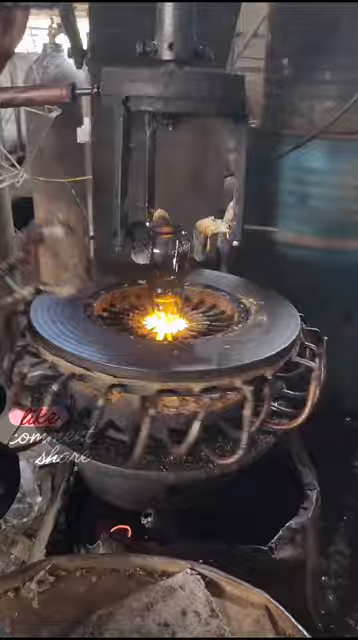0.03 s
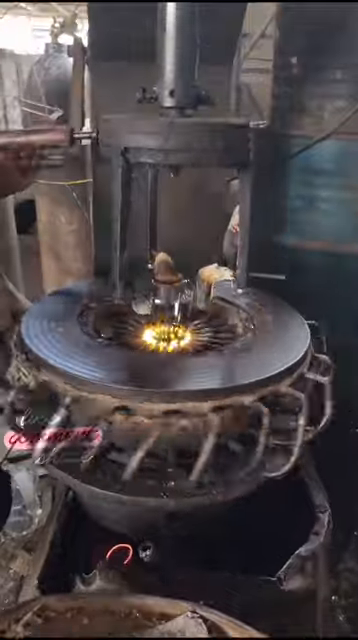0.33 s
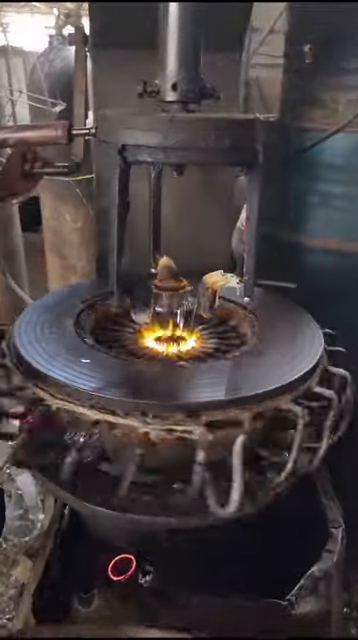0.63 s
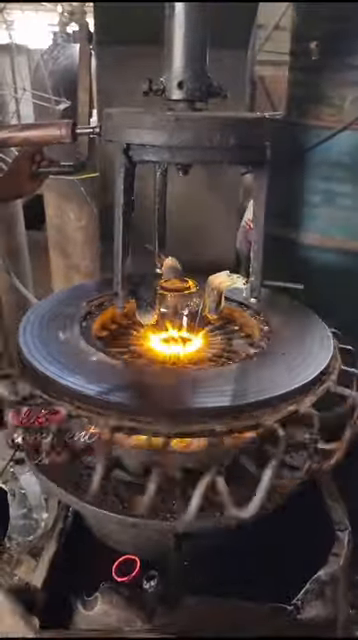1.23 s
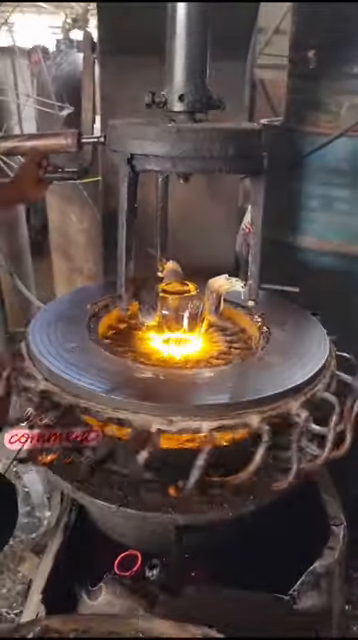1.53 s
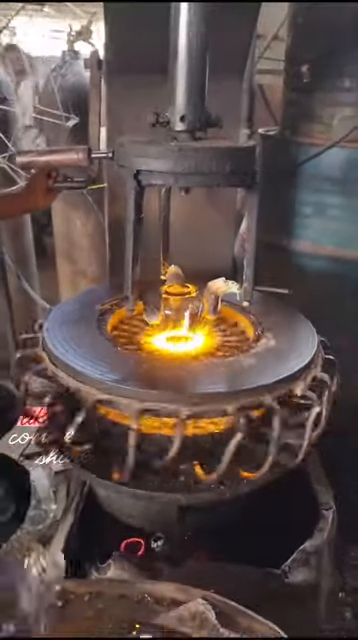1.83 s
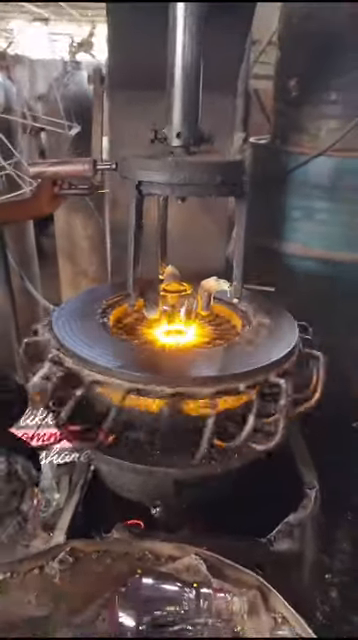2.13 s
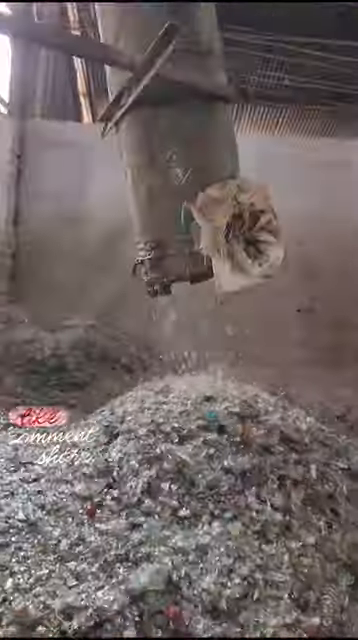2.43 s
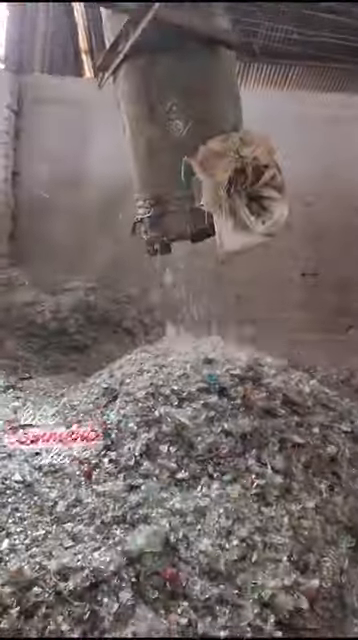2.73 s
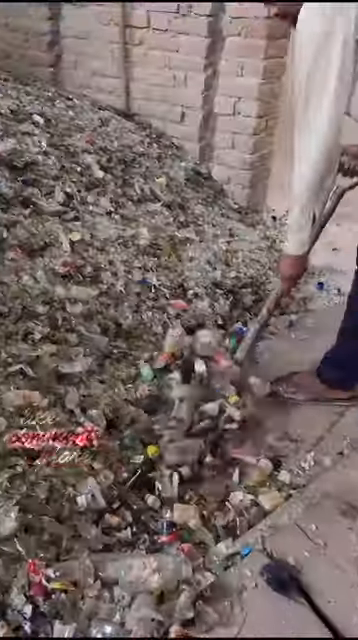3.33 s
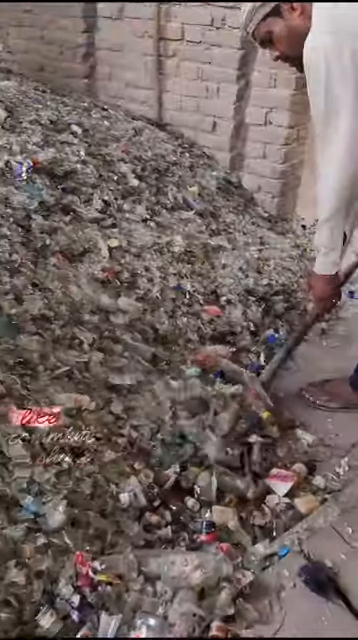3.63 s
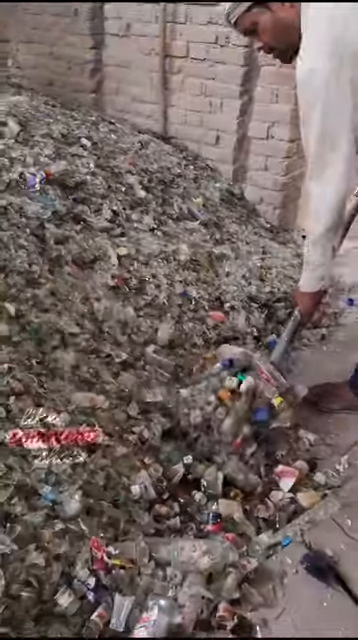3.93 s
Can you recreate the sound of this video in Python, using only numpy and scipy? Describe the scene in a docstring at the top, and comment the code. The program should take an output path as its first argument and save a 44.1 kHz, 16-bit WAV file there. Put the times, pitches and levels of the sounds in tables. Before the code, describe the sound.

A ring of gas burners roars, hums and hisses in a workshop while a steel press clanks a few times. Abruptly, crushed glass streams from a chute over a low machinery rumble, then a rake crunches through coarse shards.

```python
"""Glassworks: burners, press, crushed glass

A ring of gas burners roars, hums and hisses in a shop; a steel press clanks a few times.
Abrupt change to a heap over plant rumble: crushed glass streams from a chute,
then a rake drags through coarse shards. Each collision rings a piece of glass as a decaying sine."""
import sys
import numpy as np
from scipy import signal
from scipy.io import wavfile

SR = 44100
rng = np.random.default_rng(int(sys.argv[2]) if len(sys.argv) > 2 else 0)


def dump(signal):
    """Clip the signal to [-1, 1] and save it as 16-bit WAV at the path in sys.argv[1]."""
    limited = np.clip(np.atleast_2d(signal).T, -1, 1)
    pcm = np.round(limited * 32767).astype(np.int16)
    wavfile.write(sys.argv[1], SR, pcm)


N = 176400
T = np.arange(N) / SR
BURNER_ON_S, POUR_ON_S, RAKE_ON_S = 0.2724, 2.505, 3.23
CUTOFF_HZ = 15700

# heavy clanks: t/s, frame thud/dB, burner dip/dB
JOLTS = [(0.986, -11, 3), (1.56, -5.5, 3.5)]
# left-right likeness in the shop and at the heap: f/Hz, correlation
SHOP_CORRELATION = [(60, 1), (150, 0.99), (280, 0.92), (550, 0.64), (1000, 0.13), (2000, -0.25),
                    (4000, -0.057), (12000, -0.025)]
HEAP_CORRELATION = [(60, .99), (150, 0.99), (280, 0.91), (550, 0.64), (1000, 0.11), (2000, 0.22),
                    (4000, 0.38), (12000, 0.35)]


def from_db(db):
    """Decibels to gain."""
    return 10 ** (np.asarray(db) / 20)


def unit_rms(x):
    """Scale to rms 1."""
    return x / np.sqrt(np.mean(x ** 2) + 1e-20)


def gain_curve(rows):
    """Gain over time from rows of t/s, level/dB."""
    return from_db(np.interp(T, *np.transpose(rows)))


def at_hz(rows, hz):
    """Read a table on a log-frequency axis."""
    freqs_hz, values = np.transpose(rows)
    return np.interp(np.log(hz), np.log(freqs_hz), values)


def after(t_s):
    """Switch from 0 to 1 in 3 ms."""
    return np.clip((T - t_s) / .003, 0, 1)


def pan(left_db):
    """Left and right gains, left_db apart."""
    return from_db(np.array([[left_db], [-left_db]]) / 2)


def drift(rate_hz):
    """Slow random wander, rms 1."""
    step = 40
    pole = np.exp(-2 * np.pi * rate_hz * step / SR)
    slow = signal.lfilter([1], [1, -2 * pole, pole * pole], rng.standard_normal(N // step + 2002))[2000:]
    return np.interp(np.arange(N) / step, np.arange(len(slow)), unit_rms(slow))


def ring(drive, hz, t60_s):
    """Resonator: a unit click starts a decaying unit sine."""
    r, w = np.exp(-np.log(1000) / (t60_s * SR)), 2 * np.pi * min(hz, SR / 2) / SR
    return signal.lfilter([0, np.sin(w)], [1, -2 * r * np.cos(w), r * r], drive + 1e-18)


def clicks(t_s, db):
    """Impulse train."""
    return np.bincount((np.atleast_1d(t_s) * SR).astype(int), np.atleast_1d(from_db(db)), N)[:N]


def decay(hits, t60_s):
    """Envelope that jumps at each hit and dies away."""
    pole = np.exp(-2 * np.log(1000) / (t60_s * SR))
    return np.sqrt(signal.lfilter([1], [1, -pole], hits ** 2 + 1e-18))


def butter(x, order, hz, kind):
    """Butterworth filter."""
    return signal.sosfilt(signal.butter(order, hz, kind, fs=SR, output="sos"), x)


def stereo(pair, correlation):
    """Mix two independent signals to a left-right correlation."""
    correlation = np.clip(correlation, -.999, .999)
    return np.sqrt(1 + correlation) * pair[0] + np.sqrt(1 - correlation) * pair[1] * [[1], [-1]]


def banded_noise(spectrum, correlation, flicker_db=0):
    """Stereo noise in third octaves, each with its own level and flicker; rms 1."""
    out, edges_hz = 0, 22 * 2 ** (np.arange(30) / 3)
    white = rng.standard_normal((2, 2, N))
    for k, (low, high) in enumerate(zip(edges_hz, edges_hz[1:])):
        hz, flicker = np.sqrt(low * high), drift(14.4)
        if high > spectrum[0][0] and low < spectrum[-1][0]:
            band = stereo(butter(white[k % 2], 2, [low, high], "band"), at_hz(correlation, hz))
            out = out + from_db(at_hz(spectrum, hz) + flicker_db * flicker) * band
    return unit_rms(out)


def comb_colour(x):
    """Short delayed copies give the upper range a faint ringing colour."""
    out, upper = x.copy(), butter(x, 2, 920, "high")
    delays_s = rng.uniform(.001, .007, 10)
    for k, lag in enumerate((delays_s * SR).astype(int)):
        out[k % 2, lag:] += from_db(-11.5) * upper[k % 2, :-lag]
    return out


def flames():
    """Turbulent flames roar and excite the burner ring's resonances."""
    # roar: t/s, level/dB
    roar_levels = [(.3, -17.5), (1.0, -17.5), (1.35, -18), (1.7, -21), (2.2, -19.5), (2.5, -19.5)]
    # roar: f/Hz, density/dB
    spectrum = [(25, -45), (44, -15.5), (65, -7.5), (125, -3.5), (175, -5.5), (220, -6), (260, -9.5),
                (330, -10), (410, -16.5), (600, -14), (800, -14), (1050, -21.5), (1400, -40), (2200, -27)]
    # resonances at mean roar: f/Hz, width/Hz, level/dB
    resonances = [(198.6, 8.7, -25), (444, 23, -31.5), (515.7, 13, -34.5), (790, 26, -39.5), (882, 44, -33)]
    gain = gain_curve(roar_levels)
    roar = banded_noise(spectrum, SHOP_CORRELATION, flicker_db=2.5)
    tones = 0
    for hz, width_hz, db in resonances:
        pair = ring(rng.standard_normal((2, N)), hz, t60_s=np.log(1000) / (np.pi * width_hz))
        tones = tones + from_db(db) * unit_rms(stereo(pair, at_hz(SHOP_CORRELATION, hz)))
    return gain * roar + gain / gain.mean() * tones


def hum():
    """A low wavering hum that swells briefly three times."""
    # swells: peak t/s, boost/dB, half width/s
    swells = [(.44, 7.8, 0.033), (1.33, 6.2, 0.061), (1.8, 7.3, 0.15)]
    boost_db = sum(db * np.exp(-((T - t_s) / half_s) ** 2) for t_s, db, half_s in swells)
    pitch_hz = 166.3 + 10.85 * drift(21.5)
    return from_db(-23 + boost_db) * np.sin(2 * np.pi * np.cumsum(pitch_hz) / SR)


def jets():
    """Gas hisses at the jets."""
    # hiss: t/s, level/dB
    hiss_levels = [(.3, -26), (.6, -25), (.95, -25.5), (1.35, -26), (1.38, -23.5), (1.45, -27), (1.5, -25),
                   (1.75, -30), (2.1, -28.5), (2.5, -27.5)]
    # hiss: f/Hz, density/dB
    spectrum = [(700, -58), (1200, 0.5), (1800, 0), (4500, -11), (7000, -11.5), (10000, -20), (13500, -23),
                (15500, -48)]
    hiss = banded_noise(spectrum, SHOP_CORRELATION, flicker_db=1.8)
    return gain_curve(hiss_levels) * unit_rms(comb_colour(hiss))


def burners():
    """Flames, hum and jets; all dip briefly at the heavy clanks."""
    in_s, out_s = 0.014, 0.043
    dip_db = sum(db * np.exp(-np.maximum((t_s - T) / in_s, (T - t_s) / out_s)) for t_s, _, db in JOLTS)
    return (flames() + hum() + jets()) * from_db(-dip_db)


def press():
    """Steel strikes steel: crack, ping, ringing modes, frame thud, then the shop's echo."""
    # clanks: t/s, strike/dB, ping of the struck part f/Hz, level/dB, t60/s
    clanks = [(0.980, -18, 2310, -18.5, .025), (0.989, -7, 3110, -13.5, 0.024),
              (0.991, -11.5, 8102, -25, 0.093), (1.114, -14, 1040, -17.5, 0.032),
              (1.362, -10.5, 13900, -30, .02), (1.496, -15, 7250, -20, .014),
              (1.560, 2.5, 2220, -20, 0.036), (1.567, -3.5, 7800, -21, 0.021),
              (1.569, -7.5, 1290, -15, .045)]
    # press modes: f/Hz, level re strike/dB, t60/s
    modes = [(1265, -26, 0.073), (2140, -32, .15), (2614, -30.5, 0.12), (4130, -28, .1), (4770, -21, 0.046),
             (5625, -24, 0.066), (6200, -25, 0.073), (7214, -26, 0.04)]
    # crack and echo: f/Hz, density/dB
    crack_spectrum = [(300, -10), (1500, -17), (4500, 9), (8000, -5), (10000, -4), (15000, -8)]
    echo_spectrum = [(200, -38), (900, 6), (2000, 3.5), (3200, -6.5), (5500, -6), (9000, -18), (15000, -28)]
    strike_s, strike_db = np.transpose(clanks)[:2]
    ringing = np.zeros((2, N))
    for hz, db, t60_s in modes:
        for side in range(2):
            jitter_s = rng.uniform(0, 0.45, len(strike_s)) / hz
            ringing[side] += ring(clicks(strike_s + jitter_s, strike_db + db), hz, t60_s)
    pings = sum(ring(clicks(t_s, db), hz, t60_s) for t_s, _, hz, db, t60_s in clanks)
    crack_gain = decay(clicks(strike_s, strike_db - 12.5), t60_s=.014)
    echo_gain = decay(clicks(strike_s + 0.0078, strike_db - 20.5), t60_s=0.41)
    crack = crack_gain * banded_noise(crack_spectrum, SHOP_CORRELATION)
    echo = echo_gain * banded_noise(echo_spectrum, SHOP_CORRELATION)
    thuds = sum(ring(clicks(t_s, db), hz=56, t60_s=0.038) for t_s, db, _ in JOLTS)
    return ringing + pings + crack + echo + thuds


def plant():
    """The plant rumbles behind the heap."""
    # rumble: f/Hz, density/dB
    spectrum = [(22, -33), (45, -19), (70, -6.5), (108, -2), (165, -2.5), (250, -6.5), (450, -16.5),
                (900, -24), (1800, -29.5), (3000, -82)]
    return from_db(-18) * banded_noise(spectrum, HEAP_CORRELATION, flicker_db=1.83) * after(POUR_ON_S)


def shards(spectrum, gate, per_s, spread_db, t60_s, low_hz):
    """Random glass collisions, each with its own pitch, ring time and place; rms 1 while gated on."""
    out, chance = np.zeros((2, N + SR)), np.cumsum(gate) / gate.sum()
    count = int(per_s * gate.sum() / SR)
    when, size, pitch, length, place, sign = rng.random((8000, 6))[:count].T
    starts = np.searchsorted(chance, when)
    freqs_hz = (np.sqrt(low_hz) + pitch * (np.sqrt(CUTOFF_HZ) - np.sqrt(low_hz))) ** 2
    rings_s = np.minimum(t60_s * 2 ** (2 * length - 1) * np.sqrt(6000 / freqs_hz), .5)
    levels_db = at_hz(spectrum, freqs_hz) - spread_db * np.log(.03 + .97 * size)
    gains = np.sign(sign - .5) * from_db(levels_db) * freqs_hz ** .25 / np.sqrt(rings_s)
    for start, hz, ring_s, gain, side in zip(starts, freqs_hz, rings_s, gains, 2 * place - 1):
        ear_delay_s = .0002 * (1 + side * np.array([[-1], [1]]))
        t = np.maximum(T[:int(ring_s * SR) + 2] - ear_delay_s, 0)
        ping = np.sin(2 * np.pi * hz * t) * np.exp(-np.log(1000) * t / ring_s)
        out[:, start:start + t.shape[1]] += gain * pan(4 * side) * ping
    return unit_rms(out[:, :N]) * np.sqrt(gate.mean())


def jostled(pieces_hz, per_s, t60_s):
    """Large pieces ring under repeated knocks; rms 1."""
    out = 0
    for hz in pieces_hz:
        knocks = (rng.random(N) < per_s / SR) * rng.uniform(-0.75, 1, (2, N))
        out = out + ring(knocks, hz, t60_s)
    return unit_rms(out)


def pour():
    """Falling crumbs tick, tinkle and merge to a hiss on the heap; surges add a bright sizzle."""
    # stream: t/s, level/dB
    stream_levels = [(2.51, -31), (2.6, -30.5), (2.82, -28.5), (2.98, -31), (3.17, -27), (3.23, -28.5)]
    # stream and sizzle: f/Hz, density/dB
    spectrum = [(700, 4.5), (1400, 1), (4000, -3.5), (8800, -4), (10000, -8), (13500, -2), (15000, -4),
                (16000, -27)]
    sizzle_spectrum = [(4000, -15), (6000, -4), (7200, 2.5), (8700, 1.5), (10000, -12), (13500, -7),
                       (16000, -20)]
    # large pieces under the chute: f/Hz
    pieces_hz = [6870, 7400, 9340, 13265]
    # surges: peak t/s, level/dB, half width/s
    surges = [(2.515, -29, 0.027), (2.665, -27, 0.23), (2.802, -38, 0.027), (2.893, -30.5, 0.04)]
    gate = after(POUR_ON_S) - after(RAKE_ON_S)
    ticks = from_db(-0.5) * shards(spectrum, gate, per_s=5000, spread_db=0.5, t60_s=0.0042, low_hz=1140)
    tinkles = shards(spectrum, gate, per_s=2000, spread_db=3.2, t60_s=0.11, low_hz=2000)
    wash = from_db(-5) * banded_noise(spectrum, HEAP_CORRELATION, flicker_db=1.5)
    pieces = from_db(-15) * jostled(pieces_hz, per_s=41, t60_s=0.23)
    stream = gain_curve(stream_levels) * (ticks + tinkles + wash + pieces)
    surge = sum(from_db(db) * np.exp(-((T - t_s) / half_s) ** 2) for t_s, db, half_s in surges)
    sizzle = surge * shards(sizzle_spectrum, gate, per_s=4500, spread_db=1, t60_s=0.05, low_hz=4050)
    return comb_colour(gate * (stream + sizzle)) * pan(-1.5)


def chinks():
    """Single larger pieces ring clear of the mass."""
    # pieces: t/s, f/Hz, level/dB, t60/s
    pieces = [(2.507, 7530, -21, 0.11), (2.507, 8400, -22, 0.075), (2.655, 7600, -28, 0.45),
              (2.702, 7680, -19.5, 0.09), (2.815, 7160, -16.5, 0.049), (3.268, 5600, -34, 0.15),
              (3.318, 7550, -28.5, 0.57), (3.461, 6330, -17, 0.065), (3.768, 4920, -28, 0.24)]
    return sum(ring(clicks(t_s, db), hz, t60_s) for t_s, hz, db, t60_s in pieces)


def blade_bites(wash):
    """Each bite knocks a cluster of like-sized shards: an octave-wide noise burst."""
    # bites: t/s, level/dB, cluster f/Hz, t60/s
    bites = [(3.269, -29, 1690, .06), (3.344, -22.5, 1530, 0.22), (3.419, -13, 3300, 0.054),
             (3.632, -22, 1900, 0.14), (3.743, -23.5, 4536, 0.061), (3.766, -16, 1410, 0.039),
             (3.815, -26.5, 3700, 0.077), (3.85, -22, 2230, 0.098)]
    out = 0
    for t_s, db, hz, t60_s in bites:
        cluster = butter(wash, 1, [hz / np.sqrt(2), hz * np.sqrt(2)], "band")
        out = out + decay(clicks(t_s, db), t60_s) * unit_rms(cluster)
    return out


def rake():
    """Strokes crunch coarse shards, slide fine splinters and heave the heap; shards keep settling."""
    # strokes: peak t/s, level/dB, rise/s, fall/s, splinters/dB
    strokes = [(3.27, -32, 0.044, 0.025, -29.5), (3.444, -19.5, .1, .19, -29),
               (3.945, -27.5, 0.06, 0.018, -42), (3.99, -49, .04, .04, -29.5)]
    # coarse shards and splinters: f/Hz, density/dB
    spectrum = [(350, -46), (600, 5), (997, -3), (1730, -0.5), (2540, -2), (4330, -3.5), (6450, -2.5),
                (13000, -9), (15100, -11), (16000, -45)]
    splinter_spectrum = [(6000, -12), (9000, -11), (13000, 4), (15000, -3), (16000, -25)]
    # large pieces under the rake: f/Hz
    pieces_hz = [1700, 2635, 3890, 4600, 4945, 5150, 6274, 7100]
    gate, settling_db = after(RAKE_ON_S), -31.5
    effort, sliding = 0, 0
    for t_s, db, rise_s, fall_s, splinters_db in strokes:
        stroke = np.exp(-np.maximum((t_s - T) / rise_s, (T - t_s) / fall_s) ** 2)
        effort = effort + from_db(db) * stroke
        sliding = sliding + from_db(splinters_db) * stroke
    crunch = from_db(-3.5) * shards(spectrum, gate, per_s=4000, spread_db=1, t60_s=0.0049, low_hz=787)
    jingle = shards(spectrum, gate, per_s=2400, spread_db=3, t60_s=0.1, low_hz=1000)
    wash = from_db(-3) * banded_noise(spectrum, HEAP_CORRELATION, flicker_db=1.5)
    pieces = from_db(-9.5) * jostled(pieces_hz, per_s=46, t60_s=0.057)
    splinters = shards(splinter_spectrum, gate, per_s=1700, spread_db=0, t60_s=0.054, low_hz=6960)
    blade = from_db(-10) * unit_rms(stereo(ring(rng.standard_normal((2, N)), hz=500, t60_s=0.047), 1))
    rumble = unit_rms(ring(rng.standard_normal(N), hz=53.4, t60_s=0.15))
    heave = from_db(-27) * effort / effort.max() * rumble
    mass = np.hypot(effort, from_db(settling_db)) * (crunch + jingle + wash + pieces + blade)
    return (comb_colour(gate * (mass + sliding * splinters + heave)) + blade_bites(wash)) * pan(0.74)


def scene():
    """The burner shop, then the glass heap."""
    shop = (burners() + press()) * (after(BURNER_ON_S) - after(POUR_ON_S))
    return shop + plant() + pour() + rake() + chinks()


def record(dry):
    """Limit to full scale, then low-pass steeply."""
    return signal.sosfilt(signal.cheby2(16, 70, CUTOFF_HZ, fs=SR, output="sos"), np.clip(dry, -1, 1))


dry = scene()
out = record(dry)
dump(out)
```